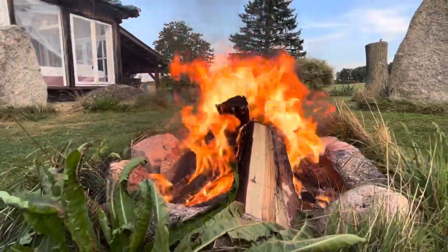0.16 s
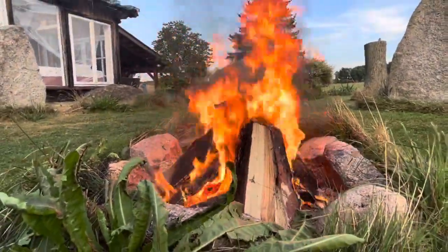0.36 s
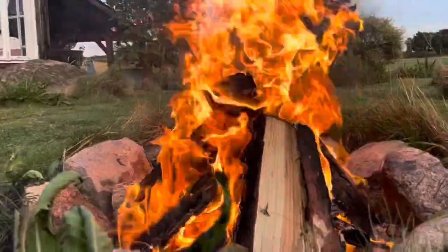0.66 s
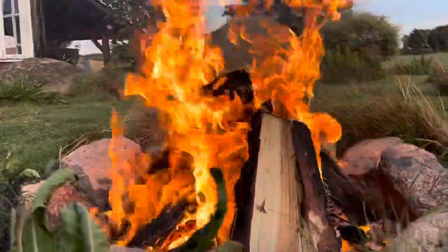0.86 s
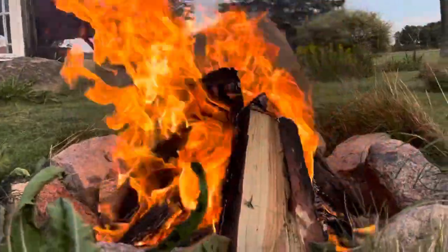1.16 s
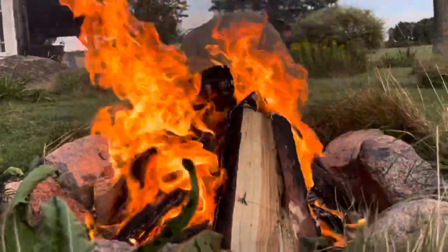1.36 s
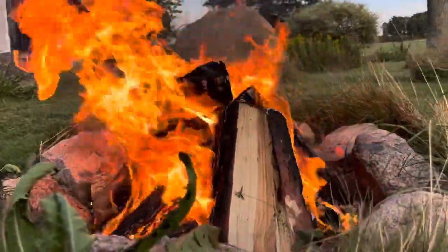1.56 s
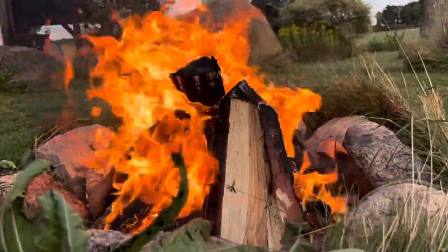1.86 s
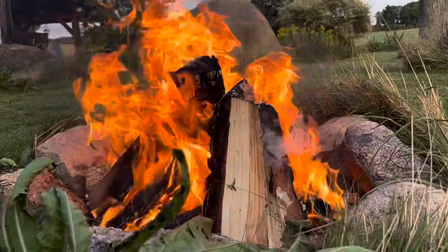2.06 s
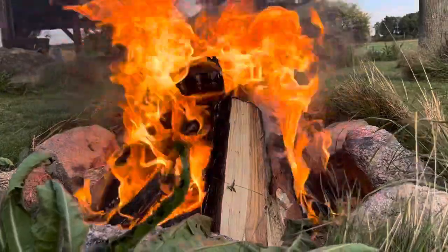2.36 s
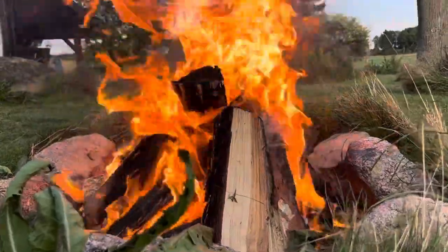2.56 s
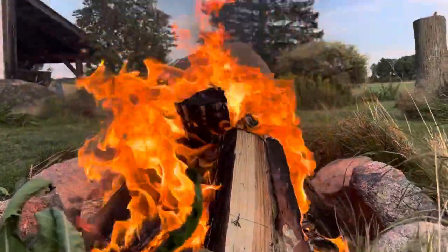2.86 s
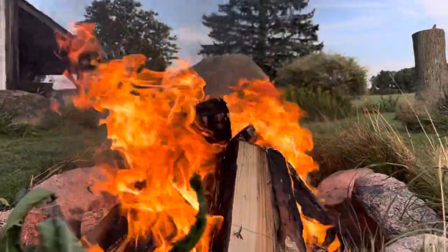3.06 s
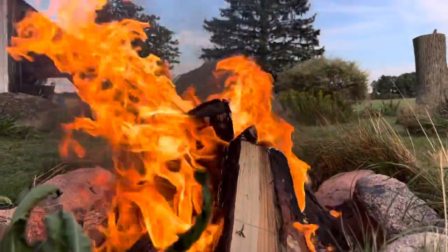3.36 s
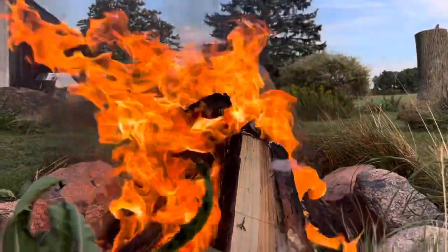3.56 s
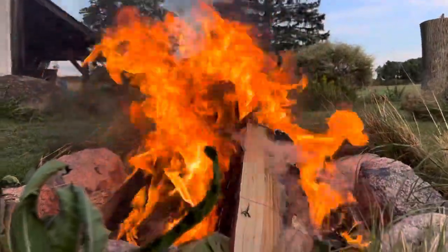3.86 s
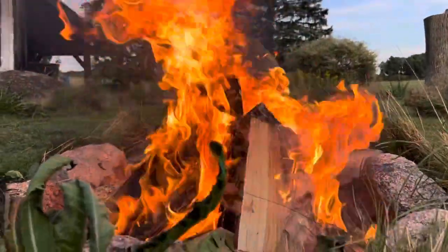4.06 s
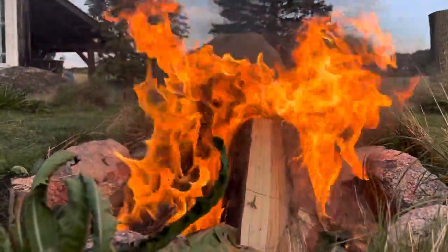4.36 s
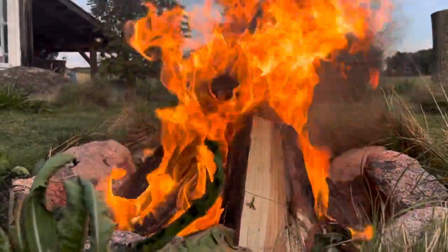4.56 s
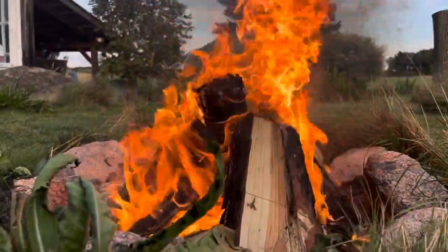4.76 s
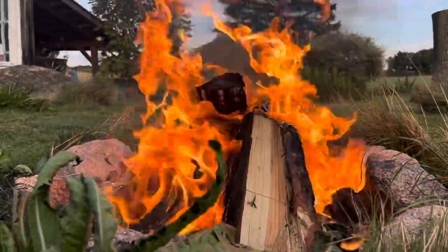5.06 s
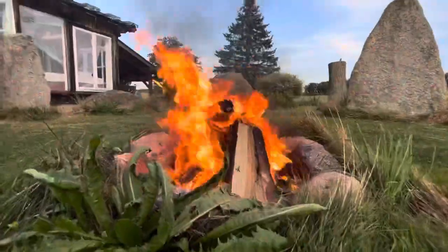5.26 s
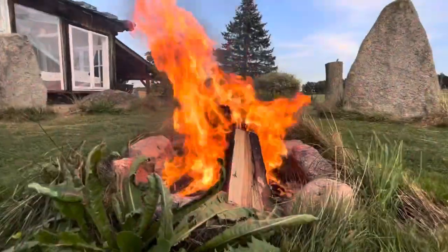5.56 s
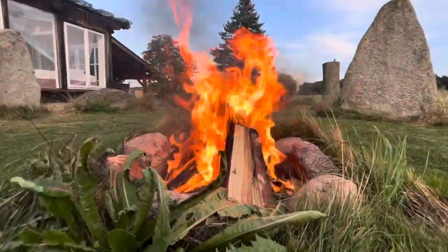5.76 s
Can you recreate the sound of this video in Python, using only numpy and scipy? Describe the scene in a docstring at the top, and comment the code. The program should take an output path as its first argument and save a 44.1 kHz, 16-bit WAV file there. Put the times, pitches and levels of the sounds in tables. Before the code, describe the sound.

Steady, lumpy flame rumble with a very faint sap hiss sits under irregular wood pops. The loudest are dry, millisecond-short cracks near 1, 1.1 and 1.8 seconds, with tiny stone echoes. Flames flap in brief low whumps. Around 3 seconds the snaps cluster; after 5.1 they return brighter, leaning left, with a fluttering gas puff. Close phone pickup, open air, no room reverberation.

```python
"""On a lawn, a log fire burns in a ring of boulders, heard by a phone with two microphone ports. Pockets of
steam burst in the wood: sharp bursts of noise that the stones throw back, with many small faint ones. Sheets of
flame flap as falling low tones, and gas escapes as short bands of fluttering noise. Behind them the flames
rumble, roar and breathe and sap hisses faintly, all made of shaped noise."""
import sys
import numpy as np
from scipy import signal
from scipy.fft import rfft, irfft, next_fast_len
from scipy.io import wavfile
from scipy.ndimage import uniform_filter1d, map_coordinates

SR = 44100
rng = np.random.default_rng(int(sys.argv[2]) if len(sys.argv) > 2 else 0)


def wrap_up_sound(samples):
    """Save the sound to the file named by the first command line argument, as 16-bit audio."""
    columns = np.atleast_2d(samples).T
    # keep every value between -1 and 1, then stretch to whole-number steps
    tamed = np.clip(columns, -1, 1)
    steps = np.round(tamed * 32767).astype(np.int16)
    wavfile.write(sys.argv[1], SR, steps)


N = 261513

EARLY_S = 0.006  # quiet room kept before each burst

# Bursting pockets of steam: (t/s, level/dB, ring f/Hz, thump level/dB, snap level/dB, echo level/dB,
# burst t60/s, left-right level/dB); thump, snap and echo count from the pop's own level
BURSTING_POCKETS = [(0.2664, -46.5, 1990, -3, -15, -14, 0.0086, 9),
                    (0.5868, -34.5, 7050, -19.5, -9, -13, 0.012, 2),
                    (0.6734, -41.5, 9500, -13, -3.5, -15, .0045, 9),
                    (0.9584, -3, 5400, -21, -17, -22, 0.0066, 7.5),
                    (1.0744, -24, 1900, -7.5, -18, 0.5, .011, 3),
                    (1.0791, 0.5, 5130, -29.5, -15.5, -26, 0.0063, 6),
                    (1.1585, -42.5, 10200, -39.5, -1.5, -19, .005, 3),
                    (1.281, -49.5, 1840, 0.5, -5, -13.5, .0086, 4.5),
                    (1.4696, -36.5, 8640, -21, -14, -10, 0.0077, 4),
                    (1.481, -39, 3430, -16, -9, -25.5, .009, 4),
                    (1.6397, -41.5, 1960, -12, -7.5, -3.5, .016, 4),
                    (1.786, 3, 2990, -21, -22, -24.5, 0.01, 1.5),
                    (1.906, -40, 9250, -21, -7.5, -14, 0.0066, 4),
                    (1.9403, -35, 2120, -13, -12.5, -20.5, 0.014, 2),
                    (1.9798, -32, 2430, -14.5, -10, -24, 0.027, 3),
                    (2.1396, -31, 5900, -34, -16, -15, .007, 9),
                    (2.2238, -45.5, 8100, -10.5, -5, -3.5, 0.0055, 4),
                    (2.2736, -36.5, 9400, -11.5, -12.5, -11.5, 0.0049, -2),
                    (2.3535, -8.5, 5000, -27.5, -10, -25.5, 0.0055, 0),
                    (2.554, -41.5, 8000, -30, -5, -27, 0.0077, 4),
                    (2.5679, -14.5, 5170, -32, -9, -23, .008, 0),
                    (2.7255, -33.5, 6900, -40.5, 0.5, -16.5, 0.0043, 3),
                    (2.8854, -20.5, 2700, -19, -20, -20, 0.0084, 3),
                    (2.9588, -22, 4330, -14.5, -11.5, -25, 0.0078, 5),
                    (3.017, -18, 9700, -28.5, -12.5, -30, 0.0065, 4),
                    (3.0504, -29, 8550, -18, -10, -31, .0066, 4),
                    (3.1036, -20.5, 3810, -11.5, -19.5, -26.5, .01, 1.5),
                    (3.229, -40, 5000, -19, -11, -25, .005, 3),
                    (3.2387, -14.5, 3800, -14.5, -15.5, -23.5, 0.0073, 2),
                    (3.3485, -45, 7180, -30, -3.5, -20.5, 0.0038, 9.5),
                    (3.4208, -48, 4990, -30.5, -11, -16, .006, 2.5),
                    (3.5975, -34.5, 3700, -8, -15, -13, 0.01, 11),
                    (3.6299, -37, 9260, -23, -5, -6.5, 0.0054, 1),
                    (4.0969, -19, 4120, -12.5, -19, -13.5, 0.012, 3.5),
                    (4.6167, -38, 2007, -15, -26, -17, 0.0082, 0.5),
                    (4.6445, -26.5, 9300, -27.5, -14.5, -19.5, 0.0086, 4),
                    (4.7114, -26.5, 8270, -15.5, -4.5, -13, 0.012, 14),
                    (4.807, -32.5, 8500, -14, -8, -29, 0.0051, 0),
                    (4.8206, -13, 3650, -21, -22, -24, 0.0091, 3),
                    (4.8665, -33, 3210, -24, -11.5, -17.5, .01, 4),
                    (5.1558, -18, 6930, -12.5, -7.5, -8.5, 0.016, 2.5),
                    (5.191, -7.5, 5960, -17.5, -12.5, -11.5, 0.019, 10.5),
                    (5.4498, -19, 4000, -18.5, -22.5, -7.5, 0.025, 8),
                    (5.47, -28, 5600, -39, -18, -17, 0.019, 21), (5.506, -40, 2140, -22, -8, -8, .008, 12),
                    (5.5251, -42, 8850, -17, -4.5, -6, .0065, 7),
                    (5.6238, -17.5, 7020, -20.5, 1, -0.5, .008, 3.5),
                    (5.6457, -11, 3760, -18.5, -34, -10.5, 0.029, 6),
                    (5.667, -19, 6100, -27, -15, -11, 0.029, 14.5),
                    (5.6882, -41, 6540, -28, -3, -29, .01, 14),
                    (5.8092, -36.5, 6300, -37, 2, -16, 0.011, 7.5)]


def pops():
    """Steam bursts pockets in the wood at set times; many fainter bursts come at random moments."""
    out = np.zeros((2, N + SR))
    ticks = []
    for when, loud, thump, snap, ring in rng.random((70, 5)):
        start = 0.0095 + when * N / SR
        level_db = -54 + 11 * loud ** 6.8  # most ticks stay near the faintest level
        ticks.append((start, level_db, 2500 + 6000 * ring, -22 + 8 * thump, -18 + 10 * snap, -21, 0.005, 3))
    for start, level_db, ring_hz, thump_db, snap_db, echo_db, t60, pan_db in list(BURSTING_POCKETS) + ticks:
        burst = pop(ring_hz, thump_db, snap_db, t60, echo_db, pan_db)
        place = out[:, round((start - EARLY_S) * SR):]
        place[:, :burst.shape[1]] += amp(level_db) * burst
    return out[:, :N]


# Tone colour of a pop at the microphone: (f/Hz, relative level/dB per Hz)
POP_COLOUR = [(120, -45), (200, -14.5), (479, -10.5), (1260, -6), (2330, -6.5), (3190, -6.5), (4220, -6),
              (5780, -10.5), (6340, -7.5), (7230, -12), (9550, -11), (11700, -10), (12900, -14.5),
              (15500, -6), (17000, -33.5)]
# How far the left port leads the right: (f/Hz, phase/radians)
LEFT_LEAD = [(0, 0), (1120, 0.4), (1640, -1.3), (1890, -0.4), (4570, 1.7), (5860, -2.3), (6550, -3.0),
             (7060, -4.9), (7920, -5.0), (8610, -6.1), (8960, -6.1), (15200, -11.8), (16400, -12.1),
             (16700, -12.8)]
# How much of a pop's left-right difference each pitch shows: (f/Hz, share)
SIDE_SHARE = [(400, 0), (1300, .4), (3500, 1.1), (6000, .9), (8500, -.1), (15000, 0)]
# Echoes from the boulders: (delay t/s, relative level/dB, smear t60/s)
STONE_ECHOES = [(0.0125, 5.5, .011), (0.021, -8, 0.015), (.0255, -6.5, 0.013), (0.047, -17.5, 0.02024),
                (0.0099, -13, 0.14)]
RING_DB, RING_OCTAVES = 8, 0.22  # how far a pop's ring stands out, and its width
ECHO_TOP_HZ = 10200  # rough rock returns little above this


def pop(ring_hz, thump_db, snap_db, t60, echo_db, pan_db):
    """One burst: a sudden crack, the log's short rattle and the stones' smeared answers."""
    t = np.arange(4096) / SR - EARLY_S
    noise = rng.standard_normal((4, len(t)))
    crack = arriving(t, 0, 0.00011, np.clip(t60, 0.001, 0.05))
    rattle = amp(-9.0) * arriving(t, 0.00029, 0.0011, 0.015)
    burst = noise[0] * (crack + rattle)
    burst[round((EARLY_S + 0.0004) * SR)] += 4.5  # the pocket's wall gives way in one step
    burst[round((EARLY_S + 0.0011) * SR)] += 2.5  # and once more off the ground
    # the low end is mostly one even shove of air
    push = 2.2 * arriving(t, 0, 0.00044, 0.002) + 0.54 * burst

    def split(hz):
        """Shares of the thump, middle and snap bands, which meet at 1500 and 6000 Hz."""
        above = 1 / (1 + (np.array([[1500], [6000]]) / (hz + 1)) ** 6)
        return np.diff(np.vstack([0 * hz, 1 - above, 0 * hz + 1]), axis=0)

    def body(hz):
        """Tone of the three bands, with the ring standing out."""
        tone = amp(along(POP_COLOUR, hz) + RING_DB * bell(hz, ring_hz, RING_OCTAVES))
        return tone * split(hz) / (1 + (hz / 14500) ** 8)

    bands = filtered(np.array([push, burst, burst]), body)
    # thump and snap: energy as if held for 2.2 ms; the middle band is set by its peak
    gains = np.array([amp(thump_db), 0, amp(snap_db)]) * np.sqrt(0.0022 * SR) / np.linalg.norm(bands, axis=1)
    gains[1] = 0.47 / np.abs(bands[1]).max()

    side = np.array([[1], [-1]])  # left, right

    def port(hz):
        """Level and phase of the pop at each port."""
        level = amp(side * pan_db / 2 * along(SIDE_SHARE, hz))
        return level * np.exp(0.5j * along(LEFT_LEAD, hz) * side)

    direct = filtered(gains @ bands, port)

    smear = sum(amp(db) * arriving(t, delay, 0.0011, spread) for delay, db, spread in STONE_ECHOES)
    # many small faces of rock answer unevenly
    smear = smear * amp(1.9 * np.repeat(rng.standard_normal(64), 64))

    def dull(hz):
        """Echo tone: half the ring in dB, and mostly the middle pitches."""
        tone = gains @ body(hz) * amp(-0.5 * RING_DB * bell(hz, ring_hz, RING_OCTAVES))
        return tone * (0.44 + bell(hz, 4200, 0.9)) / (1 + (hz / ECHO_TOP_HZ) ** 10)

    # part shared and part separate noise, so the echoes come from all around
    around = filtered(smear * (0.55 * noise[1] + 0.56 * noise[2:]), dull)
    return direct + amp(echo_db) * around / np.abs(around).max()


# Sheets of flame that flap: (t/s, peak level/dB, pitch scale f/Hz, rise t/s);
# the pitch slides from 4.14 times the scale down towards 0.78 times
FLAPPING_SHEETS = [(0.467, -33.5, 90.3, 0.021), (0.824, -38, 101, 0.017), (0.949, -31, 114.4, 0.018),
                   (1.094, -25.5, 70.7, 0.018), (2.044, -34.5, 68.8, 0.026), (3.1, -34, 49.4, 0.018),
                   (4.71, -31.5, 113, 0.0153), (5.013, -31, 132, 0.012), (5.454, -26, 96.6, 0.012)]


def flaps():
    """A sheet of flame tears loose: a tight push that slackens to a low cycle, alike at both ports."""
    out, t = np.zeros(N + SR), np.arange(SR // 8) / SR
    for start, level_db, hz, rise in FLAPPING_SHEETS:
        swell = (t / rise * np.exp(1 - t / rise)) ** 3.1
        pitch = hz * (0.78 + 3.36 * np.exp(-t / (0.38 * rise)))
        tone = np.sin(2 * np.pi * np.cumsum(pitch) / SR)
        out[round(start * SR):][:len(t)] += amp(level_db) * swell * tone
    return out[:N]


# Jets of steam and gas, the narrow ones whistle:
# (t/s, length t/s, centre f/Hz, width/octaves, level/dB before the swell and flutter)
GAS_JETS = [(0.162, 0.13, 5340, 0.24, -64.5), (1.421, 0.046, 4700, 0.81, -59),
            (1.563, 0.1, 966, 0.63, -53.5), (2.819, 0.14, 1750, 0.15, -63), (3.101, 0.023, 444, 0.73, -46),
            (4.123, 0.038, 900, 0.41, -52), (4.337, 0.041, 3700, 0.18, -66),
            (4.246, 0.03, 1172, 0.79, -61.5), (5.215, 0.26, 3450, 0.89, -60.5),
            (5.226, .39, 1560, 0.55, -58), (5.644, .02, 290, 0.62, -34)]


def puffs():
    """Gas escapes from a split in the wood: a fluttering band of noise that swells and fades."""
    out = np.zeros((2, N + SR))
    for start, length, hz, octaves, level_db in GAS_JETS:
        n = round(length * SR)
        noise = rng.standard_normal((3, n))
        # part shared, part separate noise for left and right
        band = filtered(0.58 * noise[0] + 0.85 * noise[1:], lambda f: bell(f, hz, octaves))
        flutter = amp(level_db + 1.8 * wobble(61)[:n])
        swell = np.hanning(n) ** 0.26
        out[:, round(start * SR):][:, :n] += flutter * swell * unit(band)
    return out[:, :N]


# How strongly the fire burns: (t/s, rumble level/dB, sap hiss level/dB)
BURNING = [(0.0, -47, -69), (0.38, -43.5, -68), (0.89, -41.5, -66), (1.34, -44.5, -68.5),
           (1.75, -41.5, -64), (2.0, -42.5, -67), (3.06, -42, -66), (3.4, -45.5, -69.5),
           (3.98, -41.5, -66.5), (4.13, -40, -64.5), (4.26, -43, -65.5), (4.77, -46.5, -67.5),
           (4.92, -44.5, -72), (5.19, -46, -69), (5.33, -45, -73), (5.63, -44, -62.5), (5.81, -45, -59.5),
           (5.93, -45.5, -70)]
# Tone colours of the rumble, roar and hiss: (f/Hz, relative level/dB per Hz)
RUMBLE_COLOUR = [(12, -51), (20, -29), (49, 2), (98, -1), (215, -12), (310, -14), (341, -18), (567, -28),
                 (743, -49), (900, -39), (1170, -77.5), (1980, -120)]
ROAR_COLOUR = [(290, -21.5), (500, -5.5), (1630, -14.5), (1820, -20.5), (3000, -35.5), (3900, -54),
               (6600, -120)]
HISS_COLOUR = [(1060, -33.5), (1800, 0), (5010, -3), (6580, -10.5), (9580, -1.5), (11300, -2.5),
               (11900, -11.5), (12200, -41), (13200, -37), (13700, -6), (15200, -9), (16100, 3.5),
               (16500, -26.5), (17000, -40)]
ROAR_DB, ROAR_GROWS = -20.5, 2.2  # roar against the mean rumble, and how much wider it swings in dB


def flames():
    """Turbulent burning: a lumpy rumble, a breathy roar that swells with it and a thin hiss of sap."""
    times, *columns = np.transpose(BURNING)
    strength_db, hiss_db = (np.interp(np.arange(N) / SR, times, column) for column in columns)
    mean_db = strength_db.mean()
    roar_db = mean_db + ROAR_DB + ROAR_GROWS * (strength_db - mean_db)
    flicker = wobble(12)  # shared by rumble and roar
    rumble = unit(amp(0.703 * flicker + 1.8 * wobble(40)) * rush(RUMBLE_COLOUR, patchy_db=1.23))
    roar = unit(amp(0.9 * flicker + 2.6 * wobble(45)) * rush(ROAR_COLOUR, patchy_db=2.1))
    hiss = unit(amp(0.82 * wobble(15)) * rush(HISS_COLOUR, patchy_db=1.5))
    return amp(strength_db) * rumble + amp(roar_db) * roar + amp(hiss_db) * hiss


# How alike the flames sound left and right: (f/Hz, likeness, 1 = the same, below 0 = opposed)
LIKENESS = [(60, 1), (150, 0.96), (380, 0.95), (950, 0.42), (2380, -0.21), (5980, 1), (15000, -0.33)]


def rush(colour, patchy_db):
    """Stereo noise of rms 1, louder and softer in random patches of time and pitch."""
    grid = signal.stft(rng.standard_normal((2, N)), nperseg=512)[2]
    patches = uniform_filter1d(rng.standard_normal(grid.shape[1:]), size=6, axis=0)
    patches = uniform_filter1d(patches, size=10, axis=1)
    pair = signal.istft(grid * amp(patchy_db * unit(patches)), nperseg=512)[1][:, :N]

    def mid_side(hz):
        """More middle than side where left and right are alike."""
        turn = np.arccos(np.clip(along(LIKENESS, hz), -0.99, 0.99)) / 2
        return amp(along(colour, hz)) * [np.cos(turn), np.sin(turn)]

    mid, side = filtered(pair, mid_side)
    return unit(np.array([mid + side, mid - side]))


def amp(db):
    """Decibels to gain."""
    return 10 ** (np.asarray(db) / 20)


def unit(x):
    """Scaled to rms 1."""
    return x / np.sqrt(np.mean(x ** 2) + 1e-20)


def along(points, hz):
    """(Hz, value) points read on a log axis."""
    f, v = np.transpose(points)
    return np.interp(np.log(hz + 1), np.log(f + 1), v)


def wobble(rate):
    """A smooth random curve, rate knots a second."""
    knots = rng.standard_normal(int(N * rate / SR) + 4)
    return map_coordinates(knots, [np.arange(N) * rate / SR])


def filtered(x, response):
    """x shaped by a response, possibly complex, that depends on frequency."""
    n = x.shape[-1]
    m = next_fast_len(2 * n)
    return irfft(rfft(x, m) * response(np.fft.rfftfreq(m, 1 / SR)), m)[..., :n]


def arriving(t, start, rise, t60):
    """An envelope that swells from start over rise while it decays by 60 dB per t60."""
    u = np.clip(t - start, 0, None)
    return (1 - np.exp(-u / rise)) * amp(-60 * u / t60)


def bell(hz, centre_hz, octaves):
    """A bump of height 1 on a log-frequency axis."""
    return np.exp(-0.5 * (np.log2((hz + 1) / centre_hz) / octaves) ** 2)


def scene():
    """The fire as it reaches the two ports."""
    return pops() + flaps() + puffs() + flames()


TOP_HZ = 17100  # the phone's band limit


def record(dry):
    """The loudest peaks are rounded off, and the phone keeps nothing above its band limit."""
    rounded = dry / (1 + np.abs(dry / 0.93) ** 6) ** (1 / 6)
    return filtered(rounded, lambda hz: hz < TOP_HZ)


dry = scene()
out = record(dry)
wrap_up_sound(out)
```